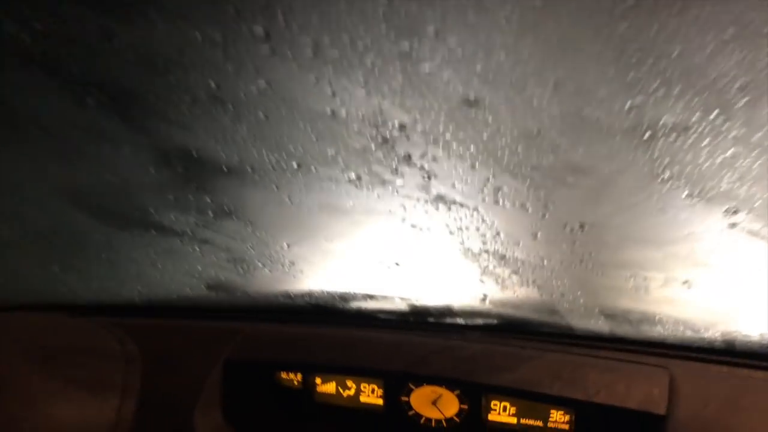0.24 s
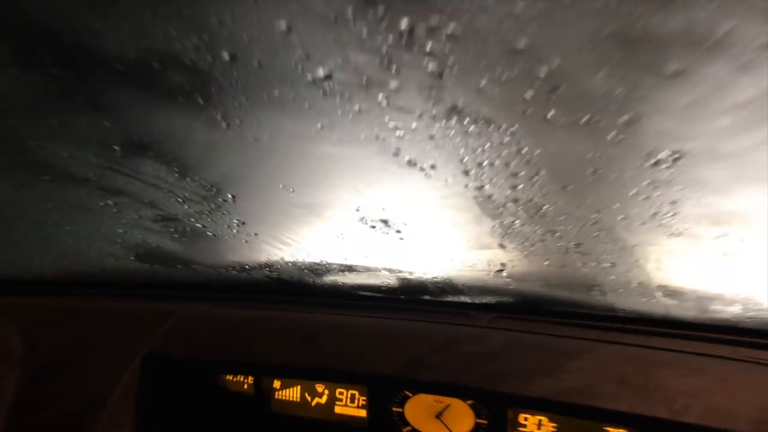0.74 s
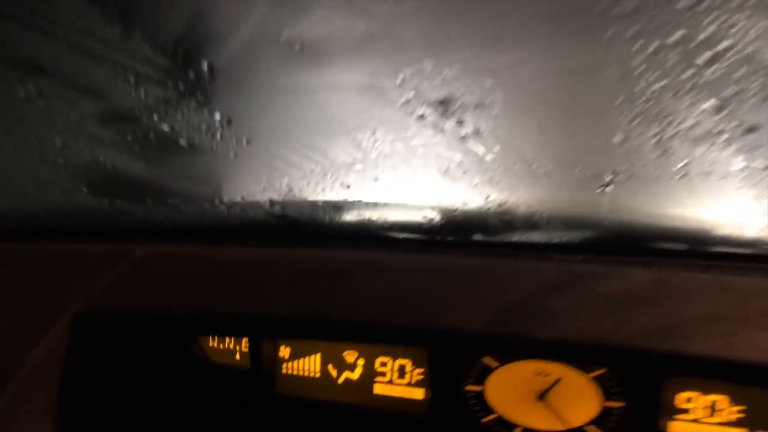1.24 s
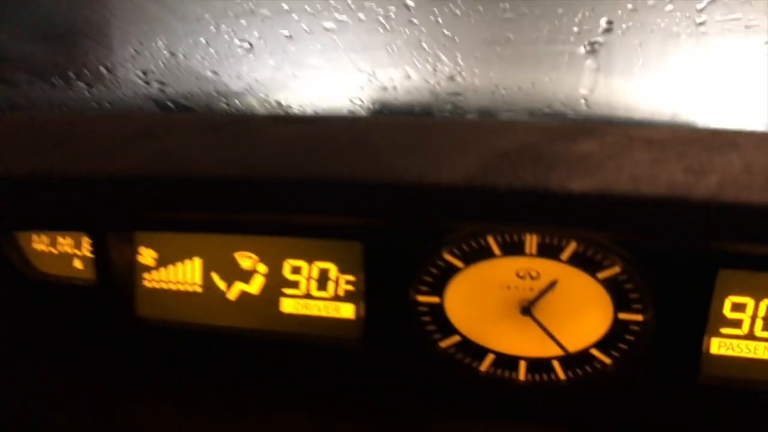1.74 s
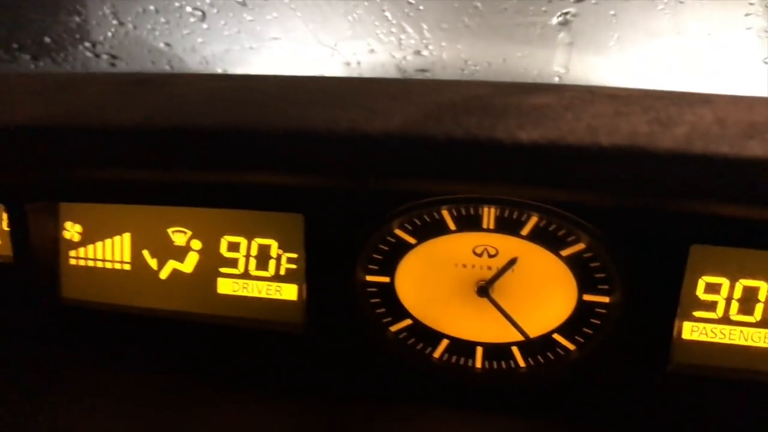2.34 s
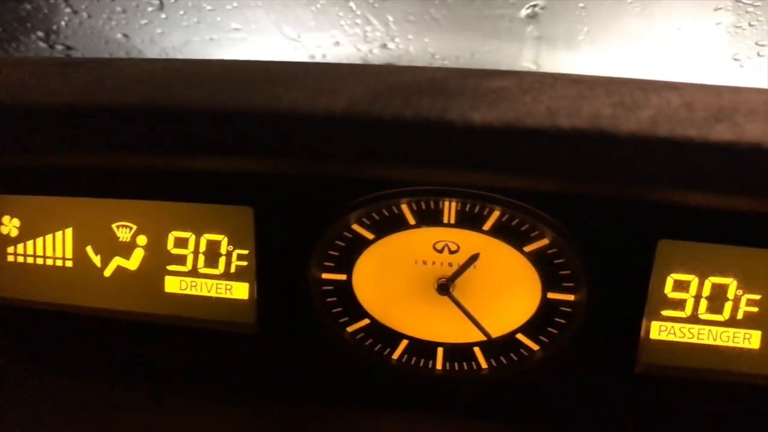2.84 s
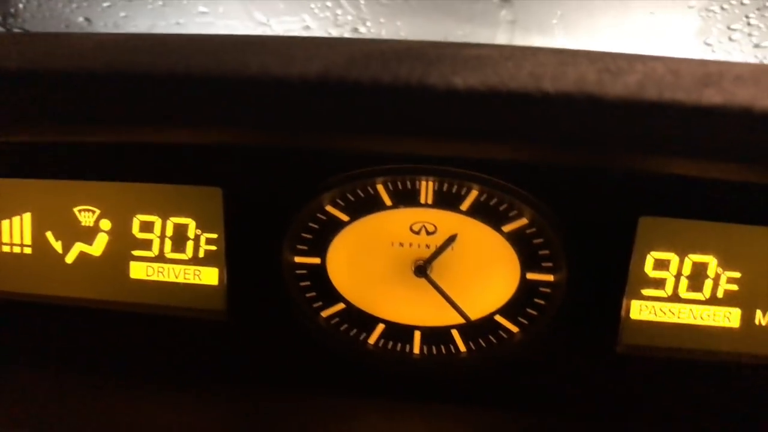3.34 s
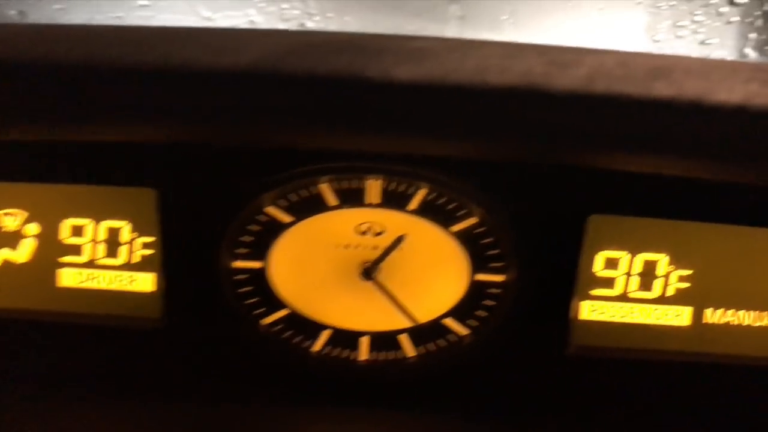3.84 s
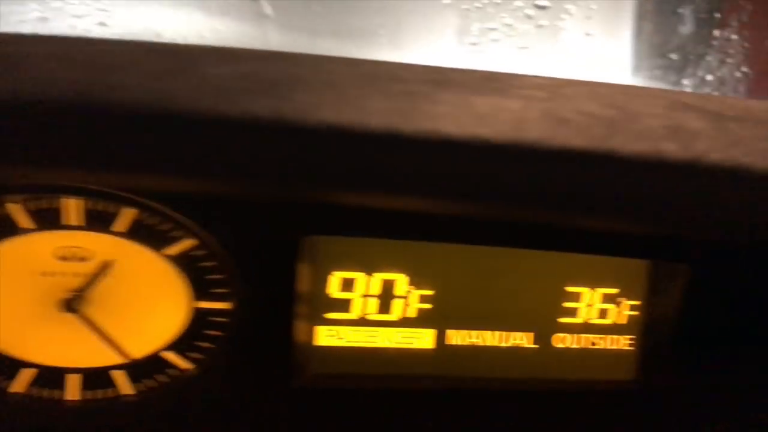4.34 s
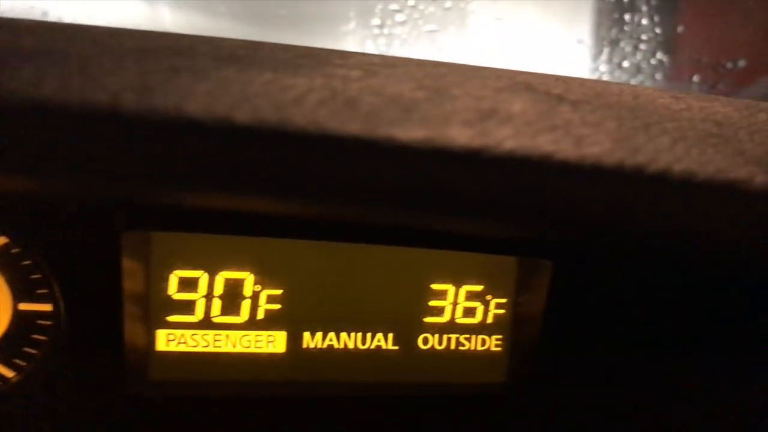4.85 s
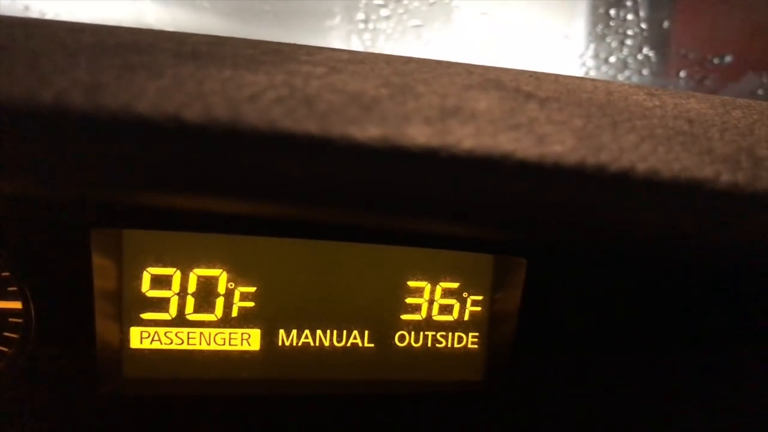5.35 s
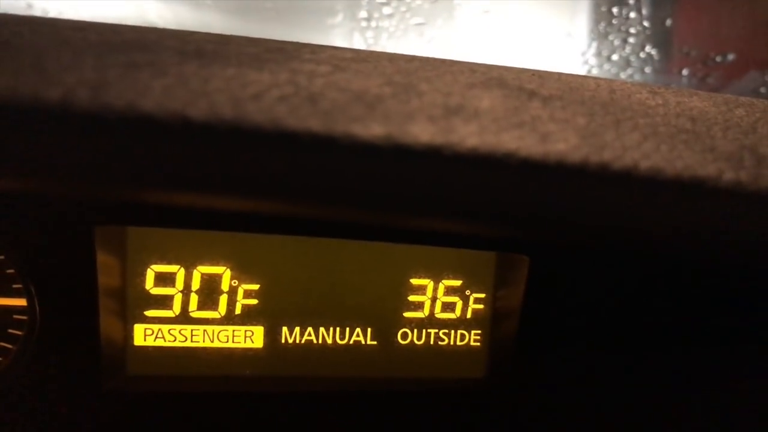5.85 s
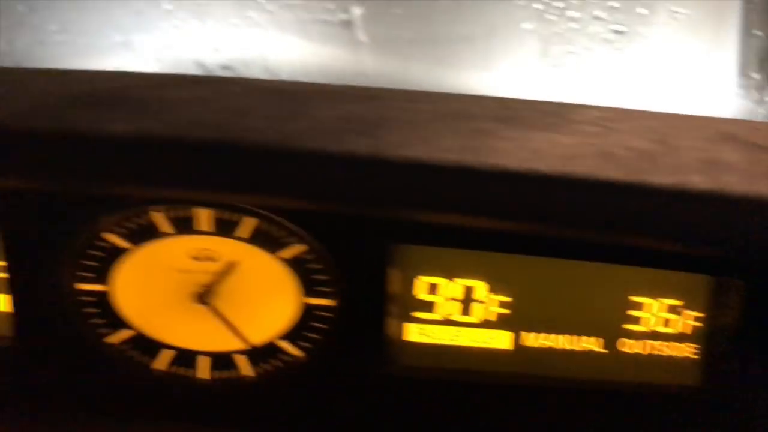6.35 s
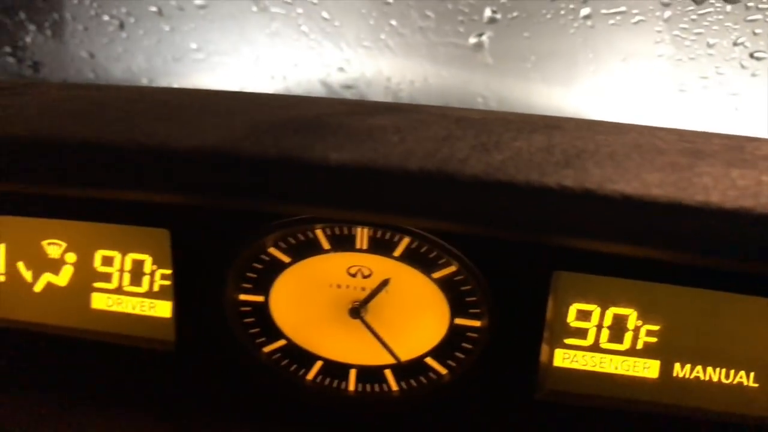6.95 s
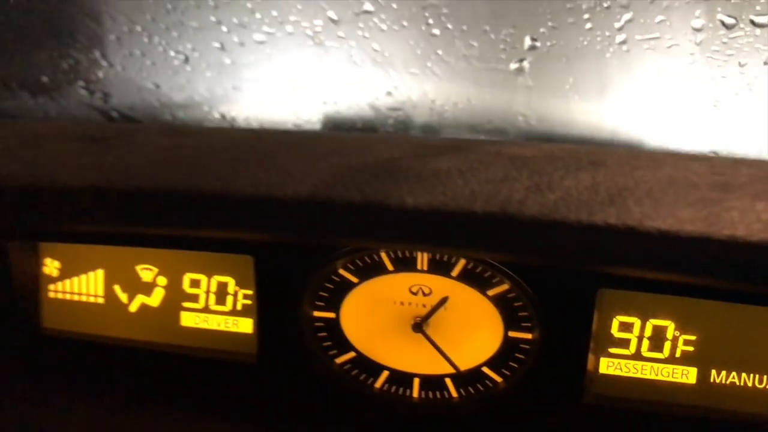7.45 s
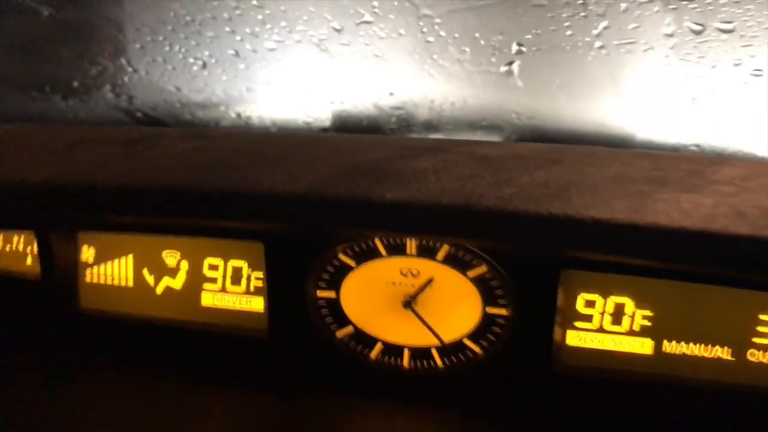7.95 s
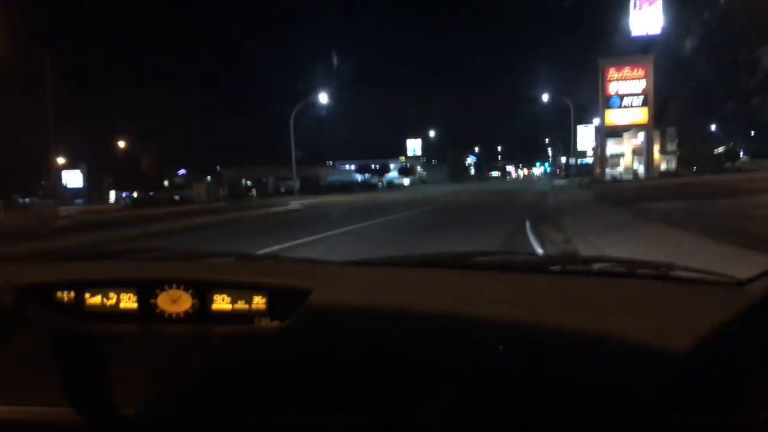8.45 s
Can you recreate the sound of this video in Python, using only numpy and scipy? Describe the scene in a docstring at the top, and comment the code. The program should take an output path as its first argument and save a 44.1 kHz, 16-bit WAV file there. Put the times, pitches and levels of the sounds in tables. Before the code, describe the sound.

Air rushes hard from a car's heater vents, heard in the cabin with the engine idling underneath. Faint finger ticks and squeaks touch the microphone at first. It then moves close to the dashboard, where the blowing swells and slowly changes colour. The fan cuts off abruptly, and a half second of louder, deeper engine and tyre rumble from the moving car ends the sound.

```python
"""Heater blower in a car

A hand-held microphone slides along the dashboard and back while the blower blasts the windshield.
Swirling air roars in the ducts over the idling engine; its tone changes as the echo off the glass shifts.
After a short silence the car is briefly heard rolling, with engine boom, tyre rumble and rushing air."""
import sys
import numpy as np
from scipy import signal
from scipy.io import wavfile
from scipy.ndimage import uniform_filter1d

SR = 44100
rng = np.random.default_rng(int(sys.argv[2]) if len(sys.argv) > 2 else 0)


def bounce(signal):
    """Save signal as a 16-bit WAV file at the path given by the first command-line argument."""
    frames = np.transpose(np.atleast_2d(signal))
    limited = np.clip(frames, -1, 1)
    pcm = np.round(limited * 32767).astype(np.int16)
    wavfile.write(sys.argv[1], SR, pcm)


N = 383229
TIME = np.arange(N) / SR

# The blower's four layers of air noise, low to high: (frequency [Hz], relative level [dB])
DRONE_SPECTRUM = [(74, -21.5), (125, -3.5), (140, -11.5), (162, -4), (183, 2), (238, -7), (292, -3.5),
                  (345, -4.5), (456, -10), (520, -13.5), (680, -20), (1140, -120)]
ROAR_SPECTRUM = [(290, -32), (500, -4), (533, -0.5), (626, -3.5), (827, -5), (926, -5.5), (1110, -9),
                 (1580, -17), (1800, -19.5), (2340, -45), (3960, -120)]
HISS_SPECTRUM = [(940, -29), (1600, -4.5), (1830, -3.5), (2540, -5), (3170, -7), (3520, -11), (4540, -10),
                 (5780, -9.5), (7600, -20.5), (9880, -42), (16700, -120)]
TOP_HISS_SPECTRUM = [(4240, -28), (7200, -8), (7730, -5), (8530, -3.5), (9250, -7.5), (10300, -7.5),
                     (11200, -8), (12800, -6.5), (15700, -13.5)]
# One row for each of those layers: (level away from the dash [dB], gain at the dash [dB],
# loss as the echo's delay grows [dB/ms])
LAYER_LEVELS = [(-40, 7.5, 3.5), (-45.5, 6, 7.5), (-50.5, -.5, -0.5), (-68, 3.5, -5.5)]
# The hand brings the microphone up to the dash: (time [s], nearness [0-1])
NEARNESS = [(0, 0), (.5, 0.14), (1, 0.52), (1.5, 0.93), (2, .95), (2.6, 0.98)]
# Sliding along the dash changes how late the echo off the glass arrives: (time [s], delay [ms])
ECHO_DELAY = [(0, 1.2), (1.35, 1.15), (1.8, 1.07), (2.1, 1), (2.36, .98), (2.6, .922), (3.4, .862),
              (3.86, .843), (4.6, .76), (5.1, .744), (6, .745), (6.36, .874), (6.86, .92), (7.35, .98),
              (7.85, 1.08), (8.1, 1.15)]
# Steady peaks and dips of ducts, cabin and microphone housing: (frequency [Hz], width [Hz], gain [dB])
RESONANCES = [(185, 40, 2), (540, 60, -3), (630, 80, 2), (10400, 500, -3), (11300, 600, 2)]
# Standing waves, the loud and quiet spots the microphone crosses; gains are scaled by STANDING_SCALE:
# (frequency [Hz], width [Hz], gain away from the dash [dB], mean gain at the dash [dB], swing [dB],
# echo delay at a crest [ms], delay between crests [ms])
STANDING_WAVES = [(932, 72, -2, 3.5, 0.4, 0.81, 0.22), (1210, 160, 3.5, 3, 3.4, 0.56, 0.88),
                  (1420, 180, 5, 3, 2.6, 1.27, 0.76), (1583, 94, 7, 0.7, 5.5, 1, 0.7),
                  (1760, 125, -1, -4, 1.5, 0.809, 0.5), (1990, 110, -6, 0.5, 5.5, 1.04, 0.26),
                  (2248, 100, -5, 4, 3.5, 0.85, 0.5), (2476, 91, -3, 5.5, 8.5, 0.64, 0.65),
                  (2650, 114, 0, 1.7, 5.1, 0.99, 0.89), (2970, 89, -0.5, -1.5, 4.5, 1.11, 0.44),
                  (3140, 220, 2, 3.0, 1.5, 0.96, 0.24), (3480, 330, 2.5, -0.2, 4, 1.19, 0.78),
                  (3860, 110, 4, -0.7, 2.5, 0.61, 0.78), (4480, 250, 1.5, 3, 3.5, 0.886, 0.2),
                  (5820, 510, -2, 1.5, 3.5, 1.027, 0.4), (6300, 400, 0, 1.7, 0.3, 0.9, 0.33),
                  (7030, 380, -4, 4, 2.2, 0.96, 0.3), (8380, 420, -5, 1.5, 4.0, 0.92, 0.78),
                  (9400, 600, 7, -2.5, 6, 0.67, 0.78), (12800, 400, 0, -3, -1, 0.852, 0.78),
                  (14000, 450, 2, 0, 1.1, 0.57, 0.78)]
# A dip that climbs as the echo's delay shortens: (delay [ms], frequency [Hz], gain at the dash [dB])
MOVING_DIP = [(.745, 6550, -1), (.8, 6300, -2), (.86, 5860, 0), (.92, 5400, -4), (.97, 5270, -4.5),
              (1, 4800, -3), (1.07, 4050, -5), (1.15, 3600, -5)]
# Change of tone as the microphone turns for the way back: (frequency [Hz], width [Hz], gain [dB])
TURNED_COLOUR = [(1550, 110, -2.5), (2040, 100, -3.5), (2400, 70, 1), (2750, 96, -1.5), (3880, 200, 3.5),
                 (4500, 270, 3), (6260, 350, -1), (7080, 350, 3), (8450, 450, -2), (9300, 500, 2.5)]
# The upper hiss swells and sinks: (time [s], gain before UPPER_HISS_SCALE [dB])
UPPER_HISS_SWELL = [(0, -1), (.6, -.5), (1.2, 2.5), (2.1, 0), (3.7, -2), (4.6, 0), (7.6, -.5), (8.1, 0.5)]
# Low rumble of the cabin: (frequency [Hz], relative level [dB])
CABIN_SPECTRUM = [(22, -34), (33, -15), (48, 3), (60, 2), (85, 0.5), (108, -1.5), (140, -8), (180, -32)]
# The idling engine's strongest tone: (time [s], pitch [Hz], level [dB])
IDLE_HUM = [(0, 118.3, -41), (1, 118.2, -35.5), (3, 118.4, -40), (5, 117.7, -40), (6, 117, -39),
            (8.13, 116, -40)]
# Faint engine tones below it: (pitch [multiple of the hum], level [dB])
IDLE_LOW_TONES = [(1 / 4, -64), (1 / 3, -53.5), (2 / 3, -50.5)]
# Engine tones booming in the rolling car: (start pitch [Hz], end pitch [Hz], top level [dB],
# dip depth [dB], time of a crest [s], time between crests [s])
ENGINE_BOOMS = [(46.56, 37.5, -16.5, 13, 8.58, 0.97), (79.7, 81.6, -18.5, 11, 8.245, 0.354),
                (116.7, 113, -22, 9, 7.4, .135), (164.4, 162.3, -20, 7, 8.36, 0.25)]
# Tyre rumble and rushing air in the rolling car: (frequency [Hz], relative level [dB])
TYRE_SPECTRUM = [(20, -21), (35, -7), (65, -1.5), (95, -8.5), (128, -0.5), (150, -9), (190, -15.5),
                 (230, -13.5), (300, -36), (450, -30.5), (600, -60)]
AIR_SPECTRUM = [(150, -29), (250, -2), (341, -8.5), (372, -7), (458, -15), (605, -7), (682, -11),
                (916, -11), (1680, -18), (2100, -23.5), (2330, -19.5), (3190, -24.5), (4350, -25),
                (7320, -35.5), (15700, -45)]
# Peaks and dips in that rushing air: (frequency [Hz], width [Hz], gain [dB])
AIR_RESONANCES = [(376, 30, 4), (2300, 170, -2), (3770, 300, -1.5), (4300, 220, 3.5), (6550, 300, 3.5),
                  (10500, 900, -4)]
# How the microphone housing rings when touched: (frequency [Hz], relative level [dB])
HOUSING_SPECTRUM = [(1500, -17), (2900, -1), (4500, -3), (7500, -12), (9000, -6), (12000, -14),
                    (14000, -10), (16000, -18)]
# Ticks of the hand on the housing: (time [s], starting level [dB], time to fall by 60 dB [s])
HAND_TICKS = [(0.126, -39, 0.011), (.127, -45, 0.043)]
# A short rub of the fingers: (time [s], level [dB])
FINGER_RUB = [(.22, -75), (.26, -61), (.3, -59), (.32, -80)]
# Faint squeaks: (time [s], length [s], start pitch [Hz], end pitch [Hz], width [Hz], level [dB])
HAND_SQUEAKS = [(0.089, .02, 1210, 1200, 79, -43), (0.254, 0.06, 1085, 1160, 45.2, -44.5),
                (.44, .17, 2690, 2520, 40, -54)]
# The standing car fades out, then the rolling car fades in and out: (time [s], gain [0-1])
SCENE_FADES = [(8.129, 1), (8.1365, .15), (8.137, 0), (8.197, 0), (8.205, .1), (8.208, 1), (8.687, 1),
               (8.69, 0)]

SHORTEST_DELAY_MS = 0.745
# Echo strength near 5.5 kHz: a base, plus an extra around one best delay.
MIDDLE_BASE, MIDDLE_EXTRA, BEST_DELAY_MS, SPREAD_MS = 0.11, 0.13, 0.95, 0.2
# Echo strength near 12 kHz: it falls as the delay grows.
TREBLE_MOST, TREBLE_LOSS_PER_MS, TREBLE_LEAST = 0.22, 0.7, 0.04
STANDING_SCALE, UPPER_HISS_SCALE = 0.85, 0.96
CABIN_DB, TYRES_DB, AIR_DB = -41.5, -18.5, -32
THROB_HZ, THROB_DB, THROB_SWING_DB = 58.7, -45.5, 3.5
TURN_S, SCENE_CHANGE_S, ROLL_S = (4.0, 7.1), 8.15, (8.21, 8.69)
LOW_EDGE_HZ, HIGH_EDGE_HZ = 22, 15760


def blower():
    """Air swirls through ducts and vents, over the low rumble of the cabin."""
    rumble = noise(steady_colour(CABIN_SPECTRUM), size=4096, patchy_db=2.3)
    return noise(blower_colour, size=2048, patchy_db=0.44) + amp(CABIN_DB) * rumble


def blower_colour(hz, t):
    """The blower's power at each frequency and time, as the moving microphone hears it."""
    near, delay_ms = curves(NEARNESS, t)[0], curves(ECHO_DELAY, t)[0]
    extra_ms = delay_ms - SHORTEST_DELAY_MS
    spectra = (DRONE_SPECTRUM, ROAR_SPECTRUM, HISS_SPECTRUM, TOP_HISS_SPECTRUM)
    layers = sum(shape(spectrum, hz) * amp(away_db + near * (gain_db - loss * extra_ms)) ** 2
                 for spectrum, (away_db, gain_db, loss) in zip(spectra, LAYER_LEVELS))
    dip_hz, dip_db = curves(MOVING_DIP, delay_ms)
    db = bumps(hz, RESONANCES) + standing_waves(hz, near, delay_ms)
    db += near * bump(hz, dip_hz, width=400, height=dip_db)
    db += bumps(hz, TURNED_COLOUR) * np.interp(t, TURN_S, (0, 1))
    # The housing makes a dip of its own, deeper away from the dash.
    db += bump(hz, 7700, width=500, height=-2) * (1 + 1.5 * (1 - near))
    db += bump(hz, 5700, width=3300, height=UPPER_HISS_SCALE) * curves(UPPER_HISS_SWELL, t)[0]
    return layers * glass_echo(hz, near, delay_ms) * amp(db) ** 2


def glass_echo(hz, near, delay_ms):
    """The echo off the windshield adds to some frequencies and takes away from others."""
    middle = near * (MIDDLE_BASE + bump(delay_ms, BEST_DELAY_MS, SPREAD_MS, MIDDLE_EXTRA))
    treble = np.maximum(TREBLE_MOST - TREBLE_LOSS_PER_MS * (delay_ms - SHORTEST_DELAY_MS), TREBLE_LEAST)
    # Long waves bend round the dash and hardly bounce back. The minus flips the echo upside down.
    echo = -bump(hz, 5500, 4500, middle) - bump(hz, 12000, 6000, treble)
    return 1 + echo ** 2 + 2 * echo * np.cos(2 * np.pi * hz * delay_ms / 1000)


def standing_waves(hz, near, delay_ms):
    """Bands of sound rise and fall, in dB, as the microphone crosses their loud and quiet spots."""
    db = 0
    for centre_hz, width_hz, away_db, mean_db, swing_db, crest_ms, spacing_ms in STANDING_WAVES:
        dash_db = mean_db + swing_db * np.cos(2 * np.pi * (delay_ms - crest_ms) / spacing_ms)
        db += bump(hz, centre_hz, width_hz, STANDING_SCALE) * (away_db + near * (dash_db - away_db))
    return db


def idling_engine():
    """The turning engine makes a hum, a wavering throb an octave below and faint low tones."""
    hz, db = curves(IDLE_HUM)
    throb = tone(THROB_HZ, THROB_DB + THROB_SWING_DB * drift(size=8000), waver_hz=1.52)
    hum = tone(hz, db, waver_hz=0.34)
    return hum + throb + sum(tone(k * hz, low_db, waver_hz=0.23) for k, low_db in IDLE_LOW_TONES)


def rolling_car():
    """The engine booms over the rumble of the tyres and the hiss of air and road."""
    rumble = amp(TYRES_DB) * noise(steady_colour(TYRE_SPECTRUM), size=4096, patchy_db=1.8)
    hiss = amp(AIR_DB) * noise(steady_colour(AIR_SPECTRUM, AIR_RESONANCES), size=2048, patchy_db=0.76)
    return sum(engine_boom(*row) for row in ENGINE_BOOMS) + rumble + hiss


def engine_boom(start_hz, end_hz, crest_db, depth_db, crest_s, beat_s):
    """One engine tone fills the cabin, gliding in pitch while it swells and sinks."""
    db = crest_db - depth_db * np.sin(np.pi * (TIME - crest_s) / beat_s) ** 2
    return tone(np.interp(TIME, ROLL_S, (start_hz, end_hz)), db, waver_hz=1.53)


def hand():
    """Fingers tick and rub on the microphone housing, which colours the sound; a few squeaks join in."""
    housing = evened(noise(steady_colour(HOUSING_SPECTRUM), size=256, patchy_db=0))
    rubbing = (TIME > FINGER_RUB[0][0]) & (TIME < FINGER_RUB[-1][0])
    loudness = amp(curves(FINGER_RUB)[0]) * rubbing
    for start_s, db, decay_s in HAND_TICKS:
        loudness += (TIME >= start_s) * amp(db - 60 * abs(TIME - start_s) / decay_s)
    return housing * loudness + sum(squeak(*row) for row in HAND_SQUEAKS)


def squeak(start_s, length_s, start_hz, end_hz, width_hz, db):
    """A fuzzy squeak: a narrow band of noise gliding in pitch."""
    count = round(length_s * SR)
    cycles = np.cumsum(np.linspace(start_hz, end_hz, count)) / SR
    fuzz = uniform_filter1d(rng.standard_normal((2, 8192)), round(SR / width_hz / 2))[:, :count]
    band = fuzz[0] * np.cos(2 * np.pi * cycles) - fuzz[1] * np.sin(2 * np.pi * cycles)
    out = np.zeros(N)
    out[round(start_s * SR):][:count] = amp(db) * evened(band) * np.hanning(count) ** 0.5
    return out


def noise(colour, size, patchy_db):
    """Noise with power colour(hz, t), made in frames of size samples, with drifting patches of swirl."""
    hop = size // 4
    t = np.arange(N // hop + 5) * hop / SR
    hz = np.fft.rfftfreq(size, 1 / SR)[:, None]
    real, imaginary, patches = rng.standard_normal((len(t), len(hz), 3)).T
    patches = evened(uniform_filter1d(uniform_filter1d(patches, size=14, axis=0), size=6, axis=1))
    frames = (real + 1j * imaginary) * np.sqrt(colour(hz, t)) * amp(patchy_db * patches)
    return np.sqrt(3 / 2) * signal.istft(frames, nperseg=size, noverlap=3 * hop)[1][:N]


def tone(hz, db, waver_hz):
    """A pure tone whose pitch wavers a little."""
    cycles = np.cumsum(hz + waver_hz * drift(size=2500)) / SR + rng.random()
    return np.sqrt(2) * amp(db) * np.sin(2 * np.pi * cycles)


def drift(size):
    """A slow random wander, smoothed over size samples."""
    return evened(uniform_filter1d(uniform_filter1d(rng.standard_normal(N), size=size), size=size))


def steady_colour(spectrum, resonances=()):
    """A noise colour whose peaks and dips stay in place."""
    return lambda hz, t: shape(spectrum, hz) * amp(bumps(hz, resonances)) ** 2


def shape(spectrum, hz):
    """Each frequency's share of a spectrum's power; the shares add up to 1."""
    points_hz, db = np.transpose(spectrum)
    power = amp(np.interp(np.log(hz + 1), np.log(points_hz + 1), db, left=-150, right=-150)) ** 2
    return power / power.sum()


def bump(x, centre, width, height):
    """A bell-shaped peak or dip; width is taken at half its height."""
    return height * np.exp(-2.77 * ((x - centre) / width) ** 2)


def bumps(hz, rows):
    """A table's peaks and dips added up, in dB."""
    return sum(bump(hz, *row) for row in rows)


def curves(rows, at=TIME):
    """Joins a table's rows with straight lines, looking up the other columns by the first."""
    points, *columns = np.transpose(rows)
    return [np.interp(at, points, column) for column in columns]


def amp(db):
    """Turns decibels into a gain."""
    return 10 ** (np.asarray(db) / 20)


def evened(x):
    """Scales a signal to an average strength (rms) of 1."""
    return x / np.sqrt(np.mean(x ** 2) + 1e-20)


def scene():
    """First the standing car, then the rolling car."""
    standing_car = blower() + idling_engine() + hand()
    return np.where(TIME < SCENE_CHANGE_S, standing_car, rolling_car())[None]


def record(dry):
    """The microphone drops the lowest bass; fades part the two scenes; the highest treble is cut."""
    bass_cut = signal.butter(3, LOW_EDGE_HZ, "high", fs=SR, output="sos")
    faded = signal.sosfilt(bass_cut, dry) * curves(SCENE_FADES)[0]
    treble_cut = signal.firwin(511, HIGH_EDGE_HZ, window=("kaiser", 9), fs=SR)
    return signal.oaconvolve(faded, treble_cut[None], "same")


dry = scene()
out = record(dry)
bounce(out)
```